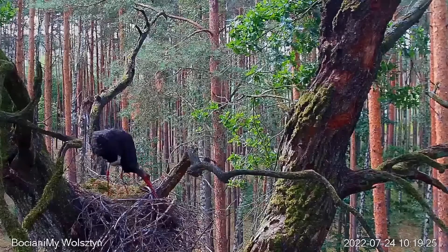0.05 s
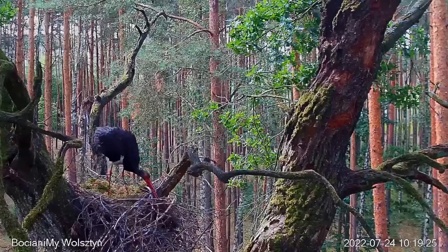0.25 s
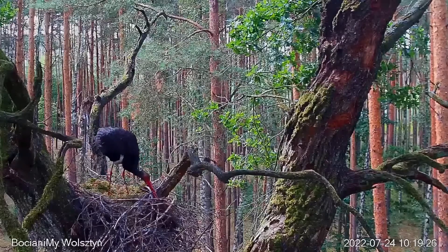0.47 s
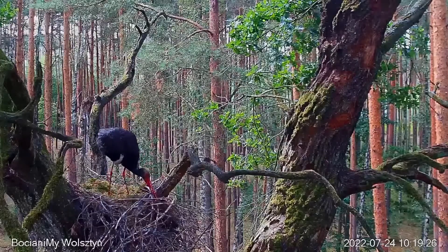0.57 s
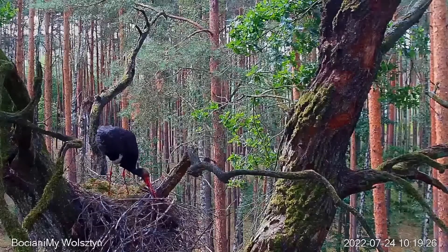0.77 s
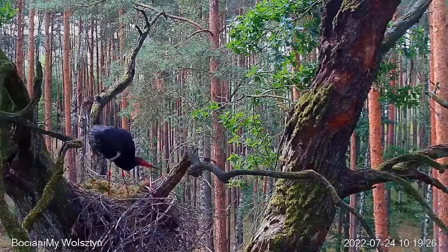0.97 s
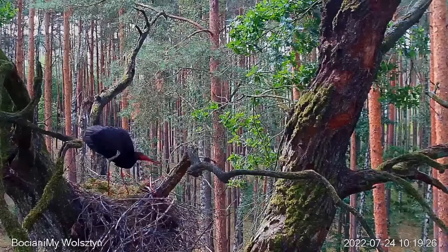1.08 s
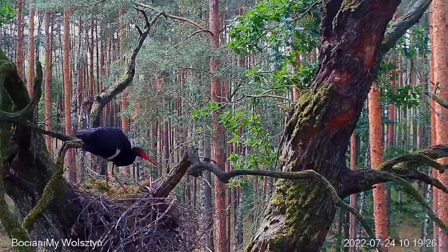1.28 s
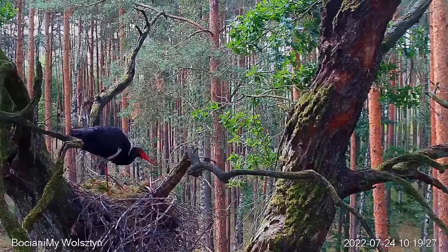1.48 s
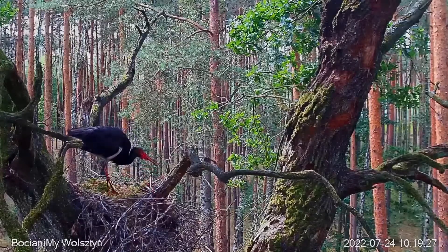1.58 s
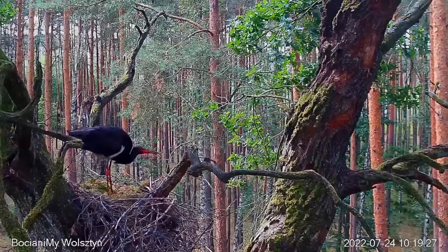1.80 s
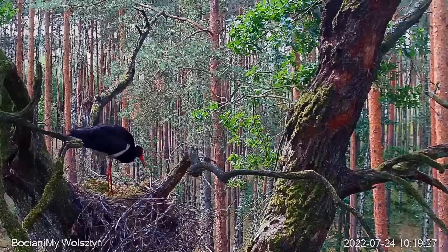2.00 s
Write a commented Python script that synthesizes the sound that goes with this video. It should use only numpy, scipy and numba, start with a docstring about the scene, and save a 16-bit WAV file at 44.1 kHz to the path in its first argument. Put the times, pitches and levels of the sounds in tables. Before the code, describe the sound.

A stork gives three thin, hoarse whistles, each followed by a raspy hiss.

```python
"""A nest in a pine forest: a black stork wheezes three thin, hoarse whistles, each followed by a hiss.
The whistle comes from a vibrating membrane; it breaks between registers and its two voices briefly beat.
Air rushing through the same throat makes the hiss, which the flapping throat wall turns to a rasp.
Trunks return a faint echo over a low rumble of wind."""
import sys
import numpy as np
from scipy import signal
from scipy.fft import rfft, irfft
from scipy.io import wavfile
from numba import njit

SR = 44100
rng = np.random.default_rng(int(sys.argv[2]) if len(sys.argv) > 2 else 0)


def store_pcm(level_fs):
    """Save levels as 16-bit WAV."""
    pcm = np.round(np.clip(level_fs, -1, 1) * 32767).astype(np.int16)
    wavfile.write(sys.argv[1], SR, np.atleast_2d(pcm).T)


N = 90404
T = np.arange(N) / SR


def undb(db):
    """Decibels to gain."""
    return 10 ** (np.asarray(db) / 20)


def unit(x):
    """Scale to rms 1."""
    return x / np.std(x)


def noise(colour):
    """Noise of rms 1, shaped by an EQ curve of (f/Hz, level/dB) points."""
    hz, db = np.array(colour, float).T
    f = np.maximum(np.arange(N // 2 + 1) * SR / N, 1)
    gain = undb(np.interp(np.log(f), np.log(hz), db, left=db[0] - 30.0, right=-100))
    return unit(irfft(rfft(rng.standard_normal(N)) * gain, N))


def wander(hz, size=8192):
    """Smooth random modulation up to about hz, rms 1."""
    f = np.arange(size // 2 + 1) * SR / N
    slow = irfft(rfft(rng.standard_normal(size)) / (1 + (f / hz) ** 4))
    return unit(np.interp(np.arange(N) * size / N, np.arange(size), slow))


def fade(times, db):
    """A breakpoint envelope that gates shut outside its points."""
    outside = np.maximum(np.maximum(times[0] - T, T - times[-1]), 0)
    return undb(np.interp(T, times, db)) * np.exp(-outside / 0.00083)


def swell(start, length):
    """A half-sine rise and fall."""
    return np.sin(np.pi * np.clip((T - start) / length, 0, 1))


def rough(phase, hz):
    """A narrow noise band, hz wide on each side of a tone; rms 1."""
    return wander(hz) * np.sin(phase) + wander(hz) * np.cos(phase)


def flap(hz, jitter=.3):
    """Uneven flapping of the throat wall, between -1 and 1."""
    return np.cos(2 * np.pi * np.cumsum(hz * (1 + jitter * wander(hz))) / SR)


def vibrate(hz, jitter=.0047, jitter_hz=520):
    """Phase of a slightly unsteady membrane."""
    return 2 * np.pi * np.cumsum(hz * (1 + jitter * wander(jitter_hz))) / SR


def partial(phase, shimmer_db=1.11, waver_db=.45):
    """One partial that shimmers fast and wavers slowly, rms near 1."""
    return np.sqrt(2) * np.sin(phase) * undb(shimmer_db * wander(hz=222.2) + waver_db * wander(hz=36))


@njit
def resonate(x, hz, width):
    """A swept state-variable band-pass."""
    y, band_state, low_state = np.empty(len(x)), 0., 0.
    for i in range(len(x)):
        g, damping = np.tan(np.pi * hz[i] / SR), width / hz[i]
        band = (band_state + g * (x[i] - low_state)) / (1 + g * (g + damping))
        band_state = 2 * band - band_state
        low_state += 2 * g * band
        y[i] = damping * band
    return y


# EQ of the wind bed and of the needle hush: f/Hz, level/dB
WIND_EQ = [(25, 8), (110, -1), (250, -9), (400, -11.5), (800, -31.5)]
NEEDLE_EQ = [(300, -12.5), (1200, -8), (3000, -14), (7300, -26)]
# soft low bumps and gusts at the nest: t/s, length/s, f/Hz, level/dB
GUSTS = [(.61, 0.2, 39.6, -60.5), (1.145, 0.2, 105, -65), (1.385, 0.1, 85, -64.5), (1.522, 0.058, 45, -59),
         (1.611, 0.23, 135, -63.5), (1.82, .26, 188.7, -71)]


def forest():
    """The bed: low wind with a few soft bumps, and a faint hush of needles."""
    gusts = sum(undb(db) * swell(start, length) * rough(2 * np.pi * centre * T, hz=59.5)
                for start, length, centre, db in GUSTS)
    return undb(-72.5) * noise(WIND_EQ) + gusts + undb(-80) * noise(NEEDLE_EQ)


# early reflections off the nearest trunks: delay/s, level/dB
REFLECTIONS = [(.0065, -11.5), (.019, -20.5)]


def trunk_echo(x, tail_db=-48.5, t60_s=.36):
    """Two near trunks answer at once, the far ones as a diffuse tail."""
    tail = rng.standard_normal(N) * undb(-60 * T / t60_s)
    tail /= np.sqrt(np.sum(tail ** 2))
    near = sum(undb(db) * np.interp(T - delay, T, x, left=0) for delay, db in REFLECTIONS)
    return near + undb(tail_db) * signal.fftconvolve(x, tail)[:N]


# envelope of the leaking air: t/s, level/dB
BREATH_ENVELOPE = [(0, -102), (0.041, -72.5), (0.098, -65.5), (.145, -77), (0.199, -62), (0.262, -50.5),
                   (.32, -49.5), (0.371, -55.5), (0.44, -92.5), (0.678, -80), (0.719, -60.5), (.8, -52),
                   (0.978, -47), (1.065, -59), (1.12, -91.5), (1.349, -108), (1.399, -59.5), (1.48, -65),
                   (1.55, -54), (1.6, -64.5), (1.67, -60), (1.75, -70), (1.839, -99)]
# throat resonances: f/Hz, level/dB
BREATH_EQ = [(800, -56.5), (1200, -45.5), (1450, 0), (1700, -41.5), (2130, -19.5), (2750, -27.5),
             (3020, 4.5), (3170, -6), (3450, 13.5), (3900, 1.5), (4250, -30.5), (4600, -3.5), (5200, -21),
             (6500, -35), (7200, -6)]


def breath():
    """Hoarse air leaks through the throat resonances under the whistles."""
    times, db = np.array(BREATH_ENVELOPE).T
    return fade(times, db) * noise(BREATH_EQ)


# one peep a row: t/s, length/s, f/Hz, level/dB
PEEP_CUES = [(0.07, 0.088, 2405, -51), (0.692, 0.028, 2404, -47.5), (1.067, 0.029, 2485, -60.5),
             (1.298, 0.031, 2011, -53), (1.369, 0.06, 2380, -62.5), (1.773, 0.045, 2192, -59)]


def peeps():
    """Brief pure tones as the air starts or stops."""
    return sum(undb(db) * swell(start, length) * partial(vibrate(hz))
               for start, length, hz, db in PEEP_CUES)


# squeaks at the edges of the whistles, one curve each: t/s, f/Hz, level/dB
SQUEAK_CURVES = [
    [(.016, 1139, -99), (.034, 1130, -58.5), (.095, 1181, -57.5), (.112, 1150, -85.5)],
    [(.418, 1196, -79), (.432, 1037, -66), (.445, 990, -100)],
    [(1.078, 1264, -98.5), (1.092, 1207, -56), (1.112, 1054, -73)],
    [(1.358, 1232, -85), (1.378, 1320, -54.5), (1.398, 1400, -74.5)],
    [(1.69, 1174, -67.5), (1.72, 1296, -61.5), (1.745, 1292, -68), (1.776, 1207, -53.5), (1.8, 1152, -63.5),
     (1.818, 1150, -56)],
]
# harmonic balance of each squeak: first/dB, second/dB, third/dB
SQUEAK_TIMBRES = [
    [0, -4.5, -6],
    [0, 4.5, -0.5],
    [0, -17, -25.5],
    [0, -6.5, -18.5],
    [0, -43, -16.5],
]


def squeaks():
    """The voice drops to a low register when the pressure is weak."""
    out = 0
    for curve, timbre in zip(SQUEAK_CURVES, SQUEAK_TIMBRES):
        times, hz, db = np.array(curve).T
        phase = vibrate(np.interp(T, times, hz))
        tone = sum(undb(level) * partial(k * phase) for k, level in enumerate(timbre, 1))
        out += fade(times, db) * tone
    return out


# rough tones where the whistle splits, one curve each: t/s, f/Hz, level/dB
SIDE_CURVES = [
    [(.2, 3044, -70), (.25, 3084, -55), (.29, 3340, -68.5), (.316, 3270, -38), (.335, 3090, -50.5)],
    [(.16, 2440, -66.5), (.39, 2520, -73)],
    [(.78, 2450, -66.5), (1.01, 2470, -63)],
    [(1.59, 1330, -74.5), (1.66, 1427, -67), (1.69, 1380, -69)],
    [(1.44, 2940, -81), (1.5, 3040, -61), (1.545, 3166, -53.5), (1.57, 3280, -66)],
    [(1.49, 3833, -57.5), (1.54, 3890, -46), (1.61, 3890, -56), (1.675, 3923, -47), (1.71, 3910, -54)],
]


def side_tones(roughness=.9):
    """Fluttering tones below the whistle's octave when the throat is pushed hard."""
    out = 0
    for curve in SIDE_CURVES:
        times, hz, db = np.array(curve).T
        phase = vibrate(np.interp(T, times, hz))
        tone = np.sqrt(1 - roughness ** 2) * partial(phase) + roughness * rough(phase, hz=70)
        out += fade(times, db) * tone
    return out


# envelope and beak resonance sweep of each hiss: t/s, level/dB, f/Hz
HISS_CURVES = [
    [(.448, -83, 3100), (.47, -53.5, 3130), (.496, -40, 3236), (.555, -34.5, 3400), (.605, -32.5, 3386),
     (.63, -38, 3256), (.645, -45, 3170), (.662, -75, 2940), (.678, -69, 3100)],
    [(1.122, -80.5, 2448), (1.16, -55.5, 2604), (1.198, -42, 2867), (1.225, -43.5, 3187),
     (1.264, -37, 3427), (1.31, -44.5, 3295), (1.33, -69.5, 2570), (1.346, -102, 2330)],
    [(1.84, -74, 3210), (1.882, -68, 3237), (1.894, -57, 3160), (1.95, -53.5, 3073), (1.995, -48.5, 3077),
     (2.028, -56, 2614), (2.04, -58.5, 2536)],
]
# throat colour of each hiss: f/Hz, level/dB
HISS_EQS = [
    [(700, -44.5), (950, -10), (1250, -34.5), (1500, -16.5), (1900, -11.5), (2450, -1.5), (2680, -17),
     (2980, -1), (3800, -3.5), (4150, -10.5), (4600, -6.5), (5150, -27.5), (5450, -17), (6200, -30),
     (6850, -13.5), (7250, -16)],
    [(950, -6), (1750, -28.5), (2100, 3), (2700, -3.5), (3750, 0.5), (4100, -8.5), (4600, -12), (5200, -56),
     (6200, -21.5), (6900, -9.5), (7250, -5)],
    [(950, -1.5), (1650, -17), (2050, 3), (3050, 2), (3950, -7), (4650, -5.5), (5250, -61), (5950, -10.5),
     (6950, -1.5), (7250, -3)],
]


def hisses(beak_width_hz=1680., lurch_hz=180, wheeze_full_db=-35.5, max_share=.75, rattle_depth=.42):
    """Turbulence in the beak; effort brightens it and adds a wheeze, chopped up by the throat wall."""
    out = 0
    for curve, eq in zip(HISS_CURVES, HISS_EQS):
        times, db, hz = np.array(curve).T
        centre, effort = np.interp(T, times, hz), fade(times, db)
        bright = unit(resonate(noise(eq), centre, beak_width_hz))
        dull = unit(resonate(bright, centre, 2 * beak_width_hz))
        air = dull + effort / effort.max() * (bright - dull)
        wheeze = np.sqrt(2) * np.sin(vibrate(centre + lurch_hz * wander(hz=201.4)))
        share = max_share * np.clip(effort / undb(wheeze_full_db), 0, 1)  # crossfade from air to wheeze
        puffs = 1 + rattle_depth * flap(hz=253)
        out += effort * (np.sqrt(1 - share) * air + np.sqrt(share) * puffs * wheeze)
    return out


# whistled notes, one curve each: t/s, f/Hz, fundamental level/dB, octave level/dB
WHISTLE_CURVES = [
    [(.158, 1746, -65, -81), (.18, 1776, -45, -50), (.218, 1825, -43, -39.5), (.25, 1878, -46, -42.5),
     (.26, 2000, -43.5, -47), (.285, 2025, -40, -44), (.308, 2003, -45.5, -43), (.322, 2047, -48, -67.5)],
    [(.31, 1930, -60, -54.5), (.322, 1885, -42, -39), (.338, 1789, -41.5, -36), (.36, 1723, -45.5, -47.5),
     (.382, 1593, -55.5, -46), (.4, 1605, -53.5, -59.5), (.422, 1370, -70.5, -89.5)],
    [(.716, 1718, -61.5, -48.5), (.736, 1778, -55, -36.5), (.77, 1771, -50, -39), (.825, 1793, -60, -37.5),
     (.87, 1838, -49.5, -35.5), (.91, 1853, -52.5, -34.5), (.955, 1880, -44.5, -31), (.998, 1856, -47, -32),
     (1.04, 1736, -49, -36.5), (1.056, 1734, -64.5, -49.5), (1.08, 1520, -62.5, -75.5)],
    [(1.385, 1684, -65.5, -66.5), (1.42, 1717, -45, -49), (1.44, 1790, -43, -54), (1.458, 1832, -60, -40.5),
     (1.48, 1815, -47, -39.5), (1.502, 1850, -55, -41.5), (1.555, 1831, -49, -46.5),
     (1.585, 1776, -60.5, -67.5)],
    [(1.51, 2012, -57, -66), (1.54, 2095, -51.5, -54.5), (1.572, 2108, -40.5, -47.5),
     (1.61, 2124, -46.5, -44), (1.66, 2107, -41, -45), (1.684, 2080, -40, -52), (1.697, 2122, -71, -56)],
    [(1.686, 1810, -57, -53.5), (1.702, 1753, -51, -49.5), (1.716, 1746, -43, -41),
     (1.738, 1690, -72, -60.5)],
]
# balance of each note against its octave: third partial/dB, fourth partial/dB, rasp/dB
WHISTLE_BALANCE = [(-24, -33, -28.5), (-30, -25, -17.5), (-36, -53.5, -33), (-37.5, -32.5, -30),
                   (-19.5, -41, -22), (-51, -61, -38.5)]
# bouts of tremolo when the whistle is forced: t/s, length/s, rate/Hz, depth/0-1
FLUTTER_CUES = [(0.28, 0.05, 250, 0.17), (0.907, 0.11, 171, 0.01), (1.48, 0.033, 226, 0.1)]


def whistles(breakup_hz=80, rasp_below_hz=50, rasp_width_hz=430):
    """High notes with a strong, fluttering octave over a rough skirt; the partials above it break up."""
    out = 0
    flutter = 1 + sum(depth * swell(start, length) * flap(hz)
                      for start, length, hz, depth in FLUTTER_CUES)
    for curve, (third_db, fourth_db, rasp_db) in zip(WHISTLE_CURVES, WHISTLE_BALANCE):
        times, hz, fundamental_db, octave_db = np.array(curve).T
        phase = vibrate(np.interp(T, times, hz))
        overtones = 0
        for k, db in [(2, 0), (3, third_db), (4, fourth_db)]:
            tone = partial(k * phase) if k == 2 else rough(k * phase, breakup_hz)
            rasp = rough(k * phase - 2 * np.pi * rasp_below_hz * T, rasp_width_hz)
            overtones += undb(db) * (tone + undb(rasp_db) * rasp)
        out += fade(times, fundamental_db) * partial(phase)
        out += fade(times, octave_db) * overtones * flutter
    return out


def scene():
    """The mono mix: the stork, its echo and the forest bed."""
    stork = whistles() + side_tones() + squeaks() + peeps() + breath() + hisses()
    return (stork + trunk_echo(stork) + forest())[None]


def record(dry):
    """A steep high cut takes off the top end."""
    cutoff_hz = 7270
    return signal.sosfilt(signal.ellip(10, .2, 70, cutoff_hz, fs=SR, output="sos"), dry)


dry = scene()
out = record(dry)
store_pcm(out)
```